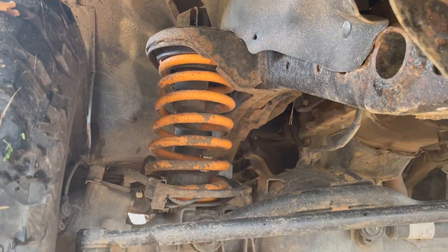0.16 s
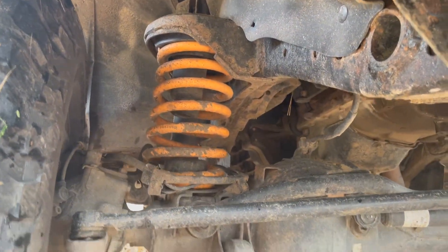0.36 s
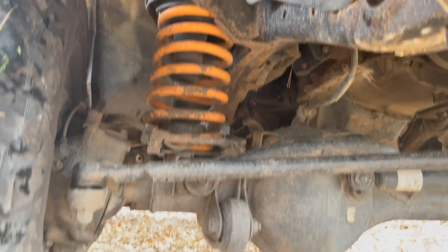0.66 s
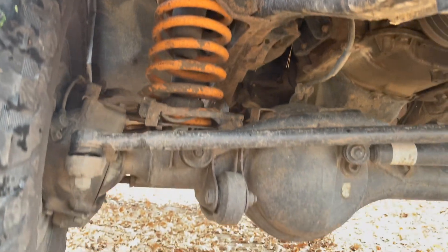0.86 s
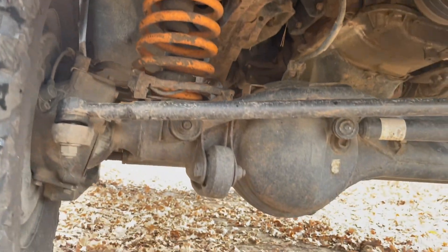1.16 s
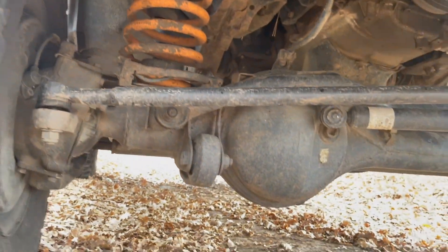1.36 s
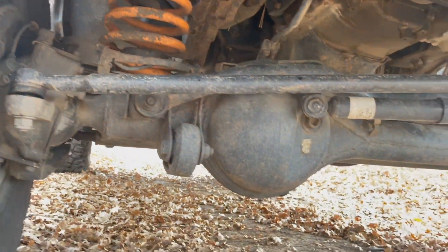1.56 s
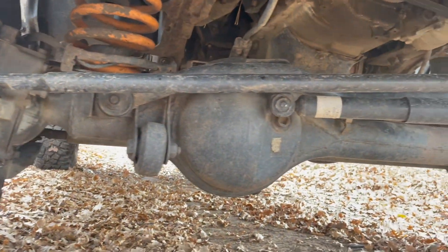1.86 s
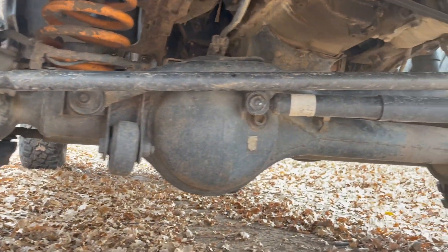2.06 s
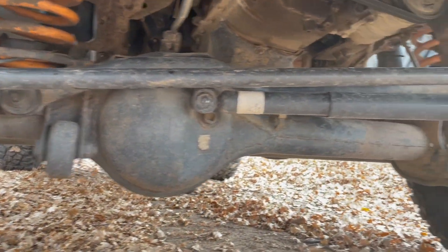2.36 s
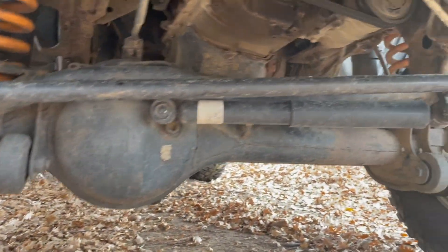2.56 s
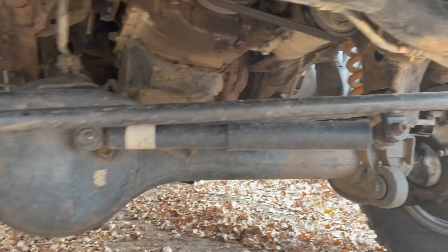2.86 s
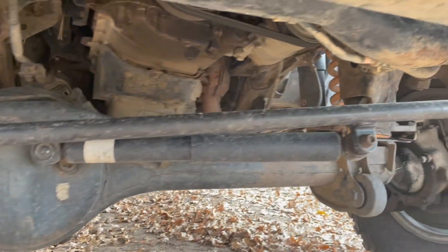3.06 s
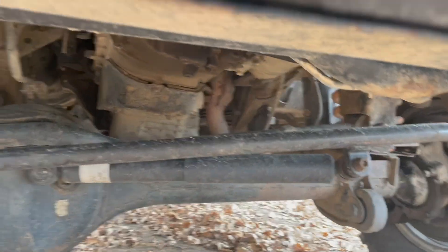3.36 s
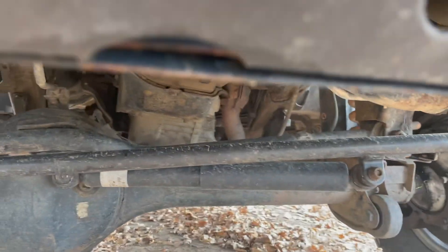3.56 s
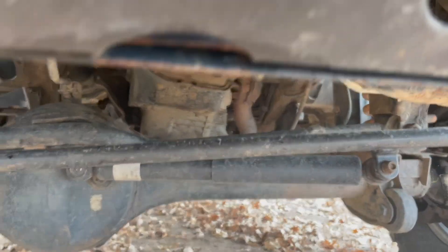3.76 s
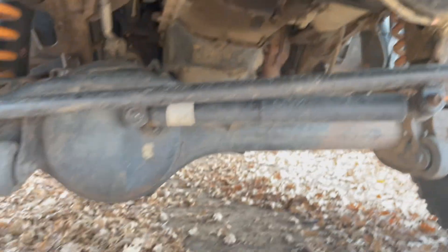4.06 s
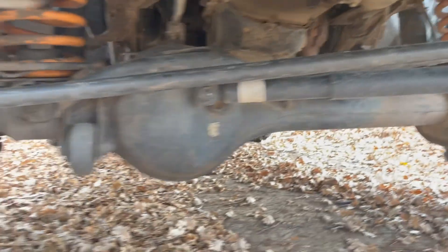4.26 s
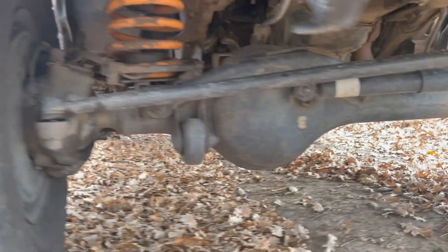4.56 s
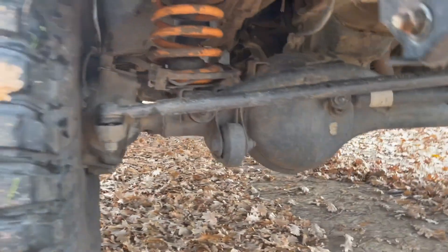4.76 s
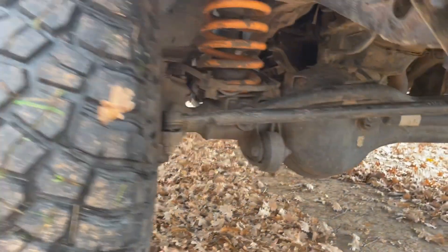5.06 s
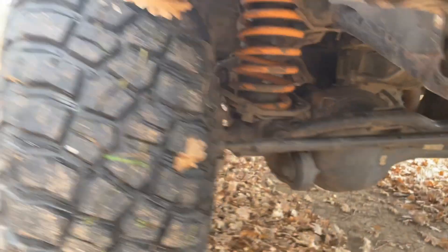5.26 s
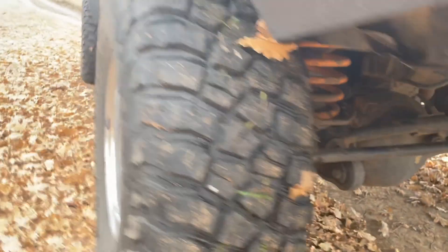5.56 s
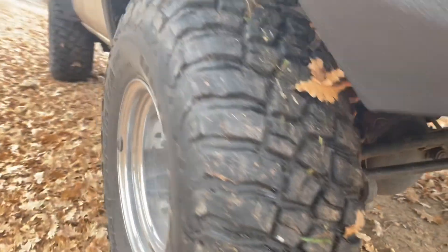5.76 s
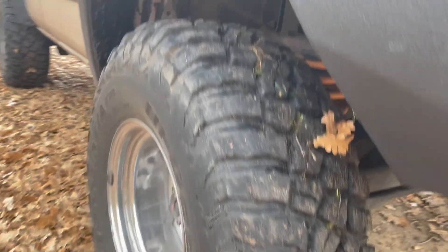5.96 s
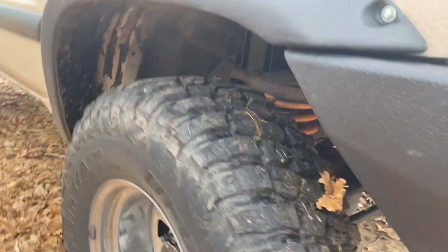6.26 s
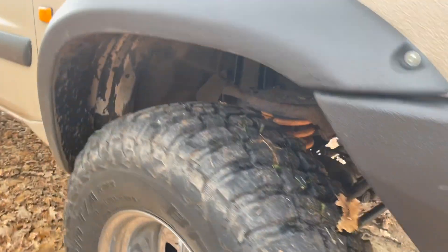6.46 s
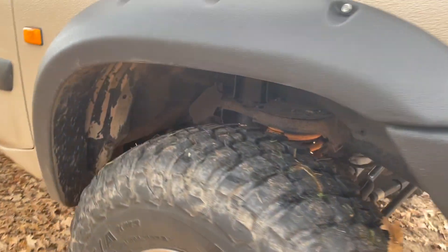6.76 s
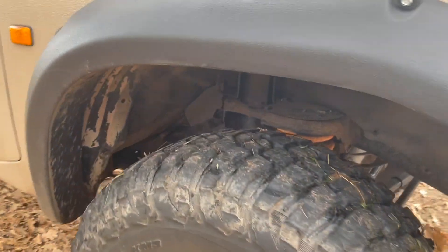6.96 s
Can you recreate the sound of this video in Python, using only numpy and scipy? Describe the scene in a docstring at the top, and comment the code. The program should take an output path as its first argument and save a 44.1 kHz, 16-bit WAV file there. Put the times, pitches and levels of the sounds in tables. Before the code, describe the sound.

Outdoors, a microphone held low and close at a vehicle's front axle hears a four-cylinder diesel idling steadily at about 750 rpm, some 25 firings a second, with no revving. Each firing has a crisp injector tick, a ringing metallic knock near 1.4 kHz, a spray of clatter and a low thud, over rumble and a throbbing middle churn. A steady whine near 500 Hz rides above. From 0 to 1.5 s the knock is moderate; it swells from 1.7 s and is strongest around 2.3-2.6 s. Between 2.7 and 4 s it leans left while a low loping thump grows. It returns bright and wide at 4.2-4.4 s, then falls back. A dull bump comes near 5 s, a soft cluster at 5.8-5.9 s and fainter ones at 6.2 and 6.45 s. Behind the tyre, from 5.5 s to the end at 7.1 s, the whine and clatter recede and the idle continues quieter, duller and slightly hollow.

```python
"""Outdoors, low down at the front axle: a four-cylinder diesel idles at 750 rpm.
Every firing brings an injector tick, a ringing knock, a spray of clatter and a thud with a whine near 500 Hz.
Clicks timed by the crank ring parts of the engine; shaped noise and harmonics of the firing rate add the rest.
Towards the end the microphone is carried round behind the tyre with a few soft bumps, and the engine
gets quieter."""
import sys
import numpy as np
from scipy import signal
from scipy.fft import rfft, irfft, next_fast_len
from scipy.io import wavfile

SR = 44100
rng = np.random.default_rng(int(sys.argv[2]) if len(sys.argv) > 2 else 0)


def master_out(mix):
    """Clip the mix to full scale and print it as 16-bit PCM to the path in sys.argv[1]."""
    frames = np.transpose(np.atleast_2d(mix))
    ceiling = np.clip(frames, -1, 1)
    pcm = np.round(ceiling * 32767).astype(np.int16)
    wavfile.write(sys.argv[1], SR, pcm)


N = 314433
TIME = np.arange(N) / SR
PADDED = next_fast_len(N, real=True)
BINS = np.fft.rfftfreq(PADDED, 1 / SR)


def from_db(db):
    """Decibels to gain."""
    return 10 ** (np.asarray(db) / 20)


def rms_one(x):
    """Scale to an average (rms) level of 1."""
    return x / np.sqrt(np.mean(x ** 2) + 1e-20)


def in_time(rows):
    """Columns of a curve at every sample."""
    s, *columns = np.transpose(rows)
    return [np.interp(TIME, s, c) for c in columns]


def over_bins(points):
    """A table over log frequency, read at every frequency bin."""
    hz, value = np.transpose(points)
    return np.interp(np.log(BINS + 1), np.log(hz), value)


def high_pass(x, low_cut_hz):
    """Remove the deepest bass."""
    return signal.sosfilt(signal.butter(2, low_cut_hz, "high", fs=SR, output="sos"), x)


def ring(clicks, hz, t60):
    """Each unit click sets a sine of height 1 ringing, which falls by 60 dB in t60 seconds."""
    r = from_db(-60 / (t60 * SR))
    w = 2 * np.pi * hz / SR
    return signal.lfilter([0, np.sin(w)], [1, -2 * r * np.cos(w), r * r], clicks + 1e-18)


def drift(rate_hz):
    """Slow random wandering of spread 1, made of noise with little above the given rate."""
    step = 20  # samples between the points that are joined up
    white = rng.standard_normal(PADDED // step + 2)
    hz = np.fft.rfftfreq(len(white), step / SR)
    slow = rms_one(irfft(rfft(white) / (1 + (hz / rate_hz) ** 2), len(white)))
    return np.interp(np.arange(N) / step, np.arange(len(slow)), slow)


def reach(part, along_m, hidden):
    """Level in dB of one part of the engine at the microphone's place."""
    near_db, db_per_m, shadow_db = part
    return near_db + db_per_m * along_m - shadow_db * hidden


# How fast the crank turns. Each row: time in seconds, speed in rpm.
CRANK_SPEED = [(0, 750), (2, 750), (2.8, 750.6), (3.6, 749.9), (5, 749.3), (6, 749.2), (6.6, 750.6),
               (7.13, 750.8)]
FIRST_FIRING_S = .030


def crank():
    """Firings counted so far: a four-cylinder, four-stroke engine fires twice for every turn."""
    firing_rate_hz = in_time(CRANK_SPEED)[0] / 30
    return np.cumsum(firing_rate_hz) / SR - FIRST_FIRING_S * firing_rate_hz[0]


def firing_samples(firings):
    """Samples at which the count of firings passes a whole number."""
    return np.flatnonzero(np.diff(np.floor(firings)))


# The microphone goes along the axle and back. Each row: time in seconds, metres from the near spring.
ALONG_AXLE_PATH = [(0, 0.6), (.9, 0.34), (1.5, 0.63), (2.3, 0.54), (2.62, 0.7), (3.05, 0.85), (3.45, 0.98),
                   (4, 0.83), (4.23, 0.74), (4.4, 0.55), (4.58, 0.3), (5.1, 0.32)]
# Then it is carried round the tyre. Each row: time in seconds, how far the tyre hides the engine (0-1).
TYRE_SHADOW = [(4.4, 0.36), (4.95, 0.44), (5.55, 0.9), (6.3, 1), (7.13, 1)]


def microphone_place():
    """Metres along the axle, and how hidden the engine is, at every sample."""
    return in_time(ALONG_AXLE_PATH)[0], in_time(TYRE_SHADOW)[0]


def far_share(along_m):
    """Harmonics and thump change from their near (0) to their far level (1) over this stretch of axle."""
    far_from_m, far_to_m = 0.48, .9
    return np.interp(along_m, [far_from_m, far_to_m], [0, 1])


# How much of the noise repeats. Each row: frequency in Hz, share that recurs in every engine cycle (0-1).
RECURRING_SHARE = [(60, 0.25), (200, 0.36), (500, 0.57), (900, 0.86), (1900, 0.47), (3500, 0.53),
                   (12000, 0.25)]
# How wide the noise sounds. Each row: frequency in Hz, level of side over mid in dB.
STEREO_WIDTH = [(60, -11), (200, -15), (400, -12), (700, -9), (1300, -7), (2400, -4.5), (5000, -5),
                (6800, -4), (8000, -95), (9700, -6), (11300, -14), (13100, -4), (14500, -15.5)]


def engine_noise(firings, spectrum):
    """Stereo noise of rms 1, part of which comes round again with every four firings."""
    cycle = round(4 / np.mean(np.diff(firings)))  # samples
    place_in_cycle = (firings / 4 % 1 * cycle).astype(int) % cycle
    share = np.clip(over_bins(RECURRING_SHARE), 0, .95)
    # it lies between the clean low orders of the firing rate
    multiple = np.arange(cycle // 2 + 1) / 4
    between = (multiple % 1 > 0) | (multiple > 32)
    # the echoes under the car change as the microphone moves, so one pattern gives way to the next
    walk, pattern = np.linspace(0, 2, N), 0
    for spot in range(3):
        random_phase = np.exp(2j * np.pi * rng.random((2, len(multiple))))
        heard = irfft(between * random_phase, cycle)
        fade = np.sqrt(np.maximum(1 - abs(walk - spot), 0))
        pattern = pattern + heard[:, place_in_cycle] * fade
    recurring = rfft(rms_one(pattern), PADDED)
    fresh = rfft(rng.standard_normal((2, N)), PADDED)
    mixed = np.sqrt(share) * recurring + np.sqrt(1 - share) * fresh
    mid, side = mixed * from_db(over_bins(spectrum))
    side = side * from_db(over_bins(STEREO_WIDTH))
    return rms_one(irfft(np.array([mid + side, mid - side]), PADDED)[:, :N])


def strikes(firings, cylinder_db, uneven_db, jitter_s):
    """One click a firing, each cylinder with a strength of its own."""
    at = firing_samples(firings)
    chance = rng.standard_normal((len(at), 2))
    late = np.round(jitter_s * SR * chance[:, 0]).astype(int)
    clicks = np.zeros(N)
    strength_db = np.resize(cylinder_db, len(at)) + uneven_db * chance[:, 1]
    clicks[np.clip(at + late, 0, N - 1)] = from_db(strength_db)
    return clicks


def bursts(clicks, hits, scattered):
    """Envelope of the contacts around each click; scattered sound fills the gaps."""
    lead = SR // 50  # samples, room for contacts that come before the click
    age = np.arange(-lead, SR // 10) / SR
    power = 0
    for start, rise, decay, db in hits:
        since = np.maximum(age - start, 0)
        swell = 1 - np.exp(-(since / rise) ** 2)
        power = power + (from_db(db) * swell * np.exp(-since / decay)) ** 2
    power = np.maximum(signal.fftconvolve(clicks ** 2, power)[lead:lead + N], 0)
    scattered = np.clip(scattered, 0, 1)
    return np.sqrt((1 - scattered) * power / power.mean() + scattered)


def scattered_share(hidden):
    """Share of the clatter and ticks that arrives scattered: more behind the tyre than in the open."""
    in_the_open, behind_tyre = 0.24, 0.39
    return in_the_open + (behind_tyre - in_the_open) * hidden


def orders(firings, table, far, hidden, lag, smear, waver_db, waver_rate_hz):
    """Harmonics of the engine cycle, lag firings after the knock; smear changes the delay between them."""
    out = 0
    for multiple, near_db, far_db, shadow_db in table:
        k = round(4 * multiple) / 4  # whole multiples of the engine cycle
        turns = k * (firings - lag) - smear * (k - table[0][0]) ** 2 / 2
        db = near_db + (far_db - near_db) * far - shadow_db * hidden
        # short waves waver most as the microphone moves
        db = db + waver_db * (k / table[-1][0]) ** 2 * drift(waver_rate_hz)
        out = out + np.sqrt(2) * from_db(db) * np.cos(2 * np.pi * turns)
    return out


# Tone of the rumble. Each row: frequency in Hz, relative level in dB per Hz.
RUMBLE_TONE = [(15, -26), (35, -22), (55, -2.5), (130, 2.5), (200, 2.5), (270, -5), (340, -8), (430, -6.5),
               (560, -15.5), (900, -37.5)]
# How the rumble carries: dB at the near spring, dB gained per metre of axle, dB lost behind the tyre.
RUMBLE_CARRY = (-31, 0.6, 4.1)


def rumble(firings, place):
    """Low noise, partly repeating with the engine cycle."""
    return from_db(reach(RUMBLE_CARRY, *place)) * engine_noise(firings, RUMBLE_TONE)


# Tone of the churn. Each row: frequency in Hz, relative level in dB per Hz.
CHURN_TONE = [(130, -58), (230, -6.5), (320, -7.5), (420, -2.5), (520, -1.5), (660, 0), (780, -1.9),
              (900, -4.5), (1100, -3.5), (1300, -3), (1800, -12.5), (3000, -68)]
# How the churn carries: dB at the near spring, dB gained per metre of axle, dB lost behind the tyre.
CHURN_CARRY = (-29.5, 4.3, 7.74)


def churn(firings, place):
    """Middle-pitched noise that throbs once with every firing."""
    throb_db, throb_lag = 2.0, .2  # lag in firings
    throb = throb_db * np.cos(2 * np.pi * (firings - throb_lag))
    return from_db(reach(CHURN_CARRY, *place) + throb) * engine_noise(firings, CHURN_TONE)


# Hollow boom in the wheel arch. Each row: time in seconds, level in dB.
ARCH_LEVEL = [(0, -36.5), (4.5, -45), (5.3, -36.5), (6.4, -42.5), (7.13, -36.5)]
# Tone of that boom. Each row: frequency in Hz, relative level in dB per Hz.
ARCH_SPECTRUM = [(230, -16), (295, -2), (325, -3), (365, -2.5), (425, -3.5), (470, -4.5), (600, -29),
                 (1200, -70)]


def arch_boom(firings):
    """The wheel arch booms: engine noise kept to a narrow, hollow range of pitches."""
    return from_db(in_time(ARCH_LEVEL)[0]) * engine_noise(firings, ARCH_SPECTRUM)


# Soft knocks on the microphone. Each row: time in seconds, strength in dB, brightness of contact in Hz.
MICROPHONE_BUMPS = [(4.975, -13, 101), (5.806, -17, 85), (5.821, -17, 130), (5.852, -16, 220),
                    (5.859, -19, 200), (5.867, -16, 200), (5.923, -17, 130), (6.206, -20, 70),
                    (6.45, -26, 70)]
# Ringing of the microphone's body. Each row: frequency in Hz, level in dB, ring time (t60) in seconds.
HOUSING_MODES = [(84, -2, 0.079), (135, -1, 0.043), (230, 0.5, 0.048)]


def bumps():
    """Dull bumps as the microphone is carried along: soft contacts ring its body."""
    push = np.zeros(N)
    for s, db, soft_hz in MICROPHONE_BUMPS:
        touch = signal.unit_impulse(N, round(s * SR)) + 1e-18
        soften = signal.butter(2, soft_hz, fs=SR, output="sos")
        push += from_db(db) * signal.sosfilt(soften, touch)
    body = sum(from_db(db) * ring(push, hz, t60) for hz, db, t60 in HOUSING_MODES)
    return high_pass(body, low_cut_hz=50)


# Ringing of the floor panels. Each row: frequency in Hz, relative level in dB, ring time (t60) in seconds.
PANEL_MODES = [(128, 0, 0.06), (189, 1.5, 0.086), (234, 0.5, 0.16)]


def lope(firings, far):
    """One cylinder pushes harder than the rest and thumps the floor panels once in every engine cycle."""
    lag, near_db, far_db = .55, -52, -36.5  # lag in firings
    clicks = strikes((firings - lag) / 4, [0], uneven_db=-0.2, jitter_s=0.00025)
    panels = sum(from_db(db) * ring(clicks, hz, t60) for hz, db, t60 in PANEL_MODES)
    return from_db(near_db + (far_db - near_db) * far) * rms_one(high_pass(panels, low_cut_hz=60))


# Harmonics of the exhaust's thud. Each row: multiple of the firing rate (played to the nearest quarter),
# dB at the near end of the axle, dB at the far end, dB lost behind the tyre.
EXHAUST_ORDERS = [(1, -62, -53, 0), (2, -27.5, -27.5, 6.5), (3, -33, -33.5, 8), (3.5, -45, -46, 7),
                  (4, -32, -29, 10), (5, -29, -32, 8.5), (6, -32, -33, 7), (6.5, -38, -49, 12),
                  (7, -50, -37.5, 5), (8, -34.5, -43, 12), (8.25, -35.5, -44, 15), (9, -52.5, -42, 6),
                  (9.25, -48.5, -44.5, 4)]


def thud(firings, far, hidden):
    """The exhaust's thud: low harmonics of the firing rate add up to a pulse."""
    return orders(firings, EXHAUST_ORDERS, far, hidden, lag=-0.075, smear=-0.2207,
                  waver_db=2.5, waver_rate_hz=1.0)


# Harmonics that the panels pick out, each strongest at its own places under the car. Each row: multiple of
# the firing rate (played to the nearest quarter), dB at the near end of the axle, dB at the far end,
# dB lost behind the tyre.
PANEL_ORDERS = [(14.01, -52.5, -41.5, 1), (15, -42, -55, 14), (15.87, -49, -43, 4.6),
                (16.95, -50, -45, 1.2), (18.14, -47.5, -39.5, 7.2), (19, -28.5, -33, 22.7),
                (19.915, -25.5, -29, 20.8), (21.01, -33, -31.5, 12.4), (22.1, -51.5, -36.5, 3.9),
                (24.09, -37.5, -31, 13.3), (26.12, -37, -43, 14), (29.14, -38, -54, 19),
                (30.15, -37.5, -58, 23), (30.95, -37, -51, 11.5), (32.05, -60, -36, 18),
                (41.4, -49.5, -40, 8.8)]


def whine(firings, far, hidden):
    """The panels pick out high harmonics of the firing rate, strongest near 500 Hz."""
    return orders(firings, PANEL_ORDERS, far, hidden, lag=.52, smear=.15, waver_db=2.5, waver_rate_hz=3.6)


# Tone of the injectors' ticks. Each row: frequency in Hz, relative level in dB per Hz.
INJECTOR_TONE = [(4000, -55), (6500, 7), (9500, 2), (11300, 1), (12400, 4), (13200, -24), (14000, 3),
                 (15000, -11), (16000, -23.5)]
# Contacts around each firing. Each row: start in seconds, rise in seconds, decay in seconds,
# relative level in dB.
INJECTOR_CONTACTS = [(-.0065, 0.00038, 0.0026, -7), (-.002, 0.00081, 0.0054, -2.5), (0.023, .003, .008, -2)]
# How ticks and needle ring carry: dB at the near spring, dB gained per metre of axle,
# dB lost behind the tyre.
TICK_CARRY = (-37, 0.18, 9.8)
NEEDLE_CARRY = (-46, -2, 15.7)


def injectors(firings, place, scattered, view_db):
    """The needles tick just ahead of each combustion, with a short bright ring."""
    clicks = strikes(firings, [0], uneven_db=3.5, jitter_s=.0002)
    ticks = engine_noise(firings, INJECTOR_TONE) * bursts(clicks, INJECTOR_CONTACTS, scattered)
    lead = .13  # firings
    taps = strikes(firings + lead, [0], uneven_db=-0.5, jitter_s=.0001)
    needle = rms_one(ring(taps, hz=12100, t60=0.032))
    # the ticks are heard best where the sump is in view
    tick_db = reach(TICK_CARRY, *place) + 0.11 * view_db
    return from_db(tick_db) * ticks + from_db(reach(NEEDLE_CARRY, *place)) * needle


# The cylinders in firing order, shared by clatter, slap and knock. Each row: relative strength of
# the knock in dB, of the clatter in dB, of the piston slap in dB.
CYLINDER_STRENGTHS = [(1.7, 4.5, 1), (2.3, 4.5, -2), (-0.7, 3.5, 0.3), (-3.7, 4, 3.8)]
# Tone of the clatter. Each row: frequency in Hz, relative level in dB per Hz.
CLATTER_TONE = [(600, -67), (1000, -4), (1350, -7), (1650, -7), (2000, 2), (2450, -0.5), (2800, -5),
                (3350, -3.5), (3850, -4.5), (4300, -6.5), (6500, -12), (8000, -16.5), (10000, -68),
                (15500, -19.5)]
# Contacts around each firing. Each row: start in seconds, rise in seconds, decay in seconds,
# relative level in dB.
CLATTER_CONTACTS = [(-.0005, 0.0023, 0.0081, -8.5), (0.0229, 0.0039, 0.018, -13.5)]
# How the clatter carries: dB at the near spring, dB gained per metre of axle, dB lost behind the tyre.
CLATTER_CARRY = (-27, 3.7, 10.5)


def clatter(firings, place, scattered):
    """Pistons and valve gear: a hard burst with the knock and a softer one before the next."""
    clicks = strikes(firings, np.array(CYLINDER_STRENGTHS)[:, 1], uneven_db=1.17, jitter_s=0.0011)
    spray = engine_noise(firings, CLATTER_TONE) * bursts(clicks, CLATTER_CONTACTS, scattered)
    return from_db(reach(CLATTER_CARRY, *place)) * spray


# Short ringing of the block and covers. Each row: frequency in Hz, relative level in dB,
# ring time (t60) in seconds.
BLOCK_MODES = [(1013, -13, 0.036), (1437, -1.5, 0.071), (1466, 9, 0.036), (1637, 3.5, 0.053),
               (1665, -3, 0.055), (1772, 2.5, 0.064), (1925, -2.5, 0.075), (2080, -8.5, 0.14),
               (2256, -3.5, 0.038), (2455, -5, 0.092), (2890, -11, 0.093), (3358, -2, 0.057),
               (3892, -1.5, 0.061), (4570, -1.5, 0.037), (5700, -4.5, 0.049)]
# How the slap carries: dB at the near spring, dB gained per metre of axle, dB lost behind the tyre.
SLAP_CARRY = (-27, 1.3, 13.3)


def piston_slap(firings, place, view_db):
    """Each piston rocks against its bore a few times, ever more softly, and favours some block modes."""
    count, spread_s, loss_db = 3, .011, 2.0  # contacts a firing, time they spread over, loss from each to the next
    cylinder_spread_db, uneven_db = 6.0, 4.5
    width = 0.12  # timing scatter in cycles of the mode, drawn separately for each side
    out = np.zeros((2, N))
    at = firing_samples(firings)
    cylinder = np.arange(len(at)) % len(CYLINDER_STRENGTHS)
    slap_strength_db = np.array(CYLINDER_STRENGTHS)[:, 2]
    for hz, db, t60 in BLOCK_MODES:
        favour_db = rng.permutation(np.linspace(-1, 1, 4)) * cylinder_spread_db + slap_strength_db
        moments = spread_s * (np.arange(count) + rng.random((len(CYLINDER_STRENGTHS), count))) / count
        chance_db = uneven_db * rng.standard_normal((len(at), count))
        size = from_db(db + favour_db[cylinder, None] - loss_db * np.arange(count) + chance_db)
        for side in range(2):
            late_s = moments[cylinder] + width / hz * rng.standard_normal((len(at), count))
            clicks = np.zeros(N)
            clicks[np.clip(at[:, None] + (late_s * SR).astype(int), 0, N - 1)] = size
            out[side] += ring(clicks, hz, t60)
    # the block is heard best where the sump is in view
    return from_db(reach(SLAP_CARRY, *place) + 0.19 * view_db) * rms_one(out)


# How the long ring carries: dB at the near spring, dB gained per metre of axle, dB lost behind the tyre.
RING_CARRY = (-31.5, -10.5, 15.7)


def sump_ring(firings, place):
    """The sump's least damped mode outlasts many firings and sings on between the knocks."""
    clicks = strikes(firings, [0], uneven_db=2.5, jitter_s=.00002)
    return -from_db(reach(RING_CARRY, *place)) * rms_one(ring(clicks, hz=1399, t60=0.43))


# Ringing of the sump, the close modes beating against each other. Each row: frequency in Hz,
# relative height with its sign, ring time (t60) in seconds.
SUMP_MODES = [(1316, 0.55, 0.11), (1420, -0.11, 0.013), (1411.5, -0.3, 0.17), (1405, -0.59, 0.065),
              (1655, 0.27, 0.029), (1710, 0.19, 0.034)]
# Knocks that stand out. Each row: time in seconds, relative force in dB.
STANDOUT_KNOCKS = [(1.754, 0), (1.914, 1), (1.991, 3), (2.233, 1), (2.273, 3.5), (2.313, 4.5), (2.393, 1),
                   (2.433, 4), (2.473, 4.5), (2.553, 0), (2.593, 4), (2.633, 2.5), (4.191, 2), (4.231, 4),
                   (4.272, 1), (4.351, 1.5), (4.392, 0.5), (4.433, 0.5), (4.472, 0)]


def knock(firings):
    """The pressure jump of each combustion rings the sump, every mode a little differently each time."""
    uneven_db, colour_db, jitter_s, right_lag_s = 1.2, 1.75, .00003, .00011
    at = firing_samples(firings)
    force_db = np.resize(np.array(CYLINDER_STRENGTHS)[:, 0], len(at))
    force_db = force_db + uneven_db * rng.standard_normal(len(at))
    for s, db in STANDOUT_KNOCKS:
        force_db[np.argmin(abs(at / SR - s))] = db
    rung = 0
    for hz, height, t60 in SUMP_MODES:
        late, colour = rng.standard_normal((2, len(at)))
        moment = at + np.round(jitter_s * SR * late).astype(int)
        clicks = np.zeros(N)
        clicks[np.clip(moment, 0, N - 1)] = from_db(force_db + colour_db * colour)
        rung = rung + height * ring(clicks, hz, t60)
    rung = rms_one(rung)
    return np.array([rung, np.interp(TIME - right_lag_s, TIME, rung)])


# Tone of the ring lingering under the car. Each row: frequency in Hz, relative level in dB per Hz.
LINGER_TONE = [(900, -54), (1240, -23), (1320, -6.5), (1360, -11.5), (1398, 4.5), (1425, -4.5), (1460, -13),
               (1520, -15), (2200, -64)]


def lingering_ring(firings):
    """The sump's ring lingers between the floor pan and the ground, as narrow noise around its pitch."""
    return engine_noise(firings, LINGER_TONE)


# Level of the knock, loudest where a gap above the axle lays the sump open. Each row: time in seconds,
# left level in dB, right level in dB; the direct and the lingering sound each sit below this.
SUMP_LEVEL = [(0, -25, -25.5), (0.5, -25.5, -26), (0.65, -29.5, -29.5), (1.25, -28, -26.5),
              (1.75, -22, -20.5), (2.1, -21.5, -20.5), (2.3, -17.5, -20), (2.64, -18, -20),
              (2.67, -21, -33), (2.78, -20, -32), (3.1, -28.5, -45), (3.7, -25.5, -47), (4, -26, -41),
              (4.13, -18.5, -29), (4.21, -19.5, -20), (4.42, -20, -16), (4.55, -31, -27.5), (4.8, -25, -25),
              (5.05, -30.5, -34), (5.6, -34.5, -39), (7.13, -33, -38)]


def sump(firings, place, level_db):
    """Direct knock, its lingering ring and the long singing mode together."""
    direct_db, linger_db = -4.2, -17
    heard = from_db(direct_db) * knock(firings) + from_db(linger_db) * lingering_ring(firings)
    return from_db(level_db) * heard + sump_ring(firings, place)


def scene():
    """All parts of the engine run off one crankshaft; the microphone's place sets how loud each one is."""
    firings = crank()
    along_m, hidden = place = microphone_place()
    far = far_share(along_m)
    scattered = scattered_share(hidden)
    sump_db = np.array(in_time(SUMP_LEVEL))
    view_db = sump_db[0] - sump_db.max()  # how well the sump is in view, from the left level

    sides = np.array([[1], [-1]])  # left, right
    bass_pan_db, metal_pan_db = -.3, .8  # positive leans left
    bass = rumble(firings, place) + lope(firings, far) + thud(firings, far, hidden)
    bass = bass * from_db(bass_pan_db * sides)
    middle = churn(firings, place) + arch_boom(firings) + whine(firings, far, hidden)
    ticks = injectors(firings, place, scattered, view_db)
    metal = clatter(firings, place, scattered) + piston_slap(firings, place, view_db)
    metal = metal * from_db(metal_pan_db * sides)
    return bass + middle + bumps() + ticks + metal + sump(firings, place, sump_db)


# The spaced microphone ports drift out of step in the treble. Each row: frequency in Hz,
# half cycles by which the right leads.
RIGHT_PORT_LEAD = [(5800, 0), (6800, .2), (7800, .97), (8700, 1.03), (10600, 1.97), (12200, 2.03),
                   (13900, 2.95), (15500, 3.1)]
CUTOFF_HZ = 15750


def record(dry):
    """The two ports hear the treble out of step; the top is cut."""
    turn = np.exp(.5j * np.pi * over_bins(RIGHT_PORT_LEAD) * np.array([[-1], [1]]))
    heard = irfft(rfft(dry, PADDED) * turn, PADDED)[:, :N]
    return signal.sosfilt(signal.ellip(10, .2, 80, CUTOFF_HZ, fs=SR, output="sos"), heard)


dry = scene()
out = record(dry)
master_out(out)
```